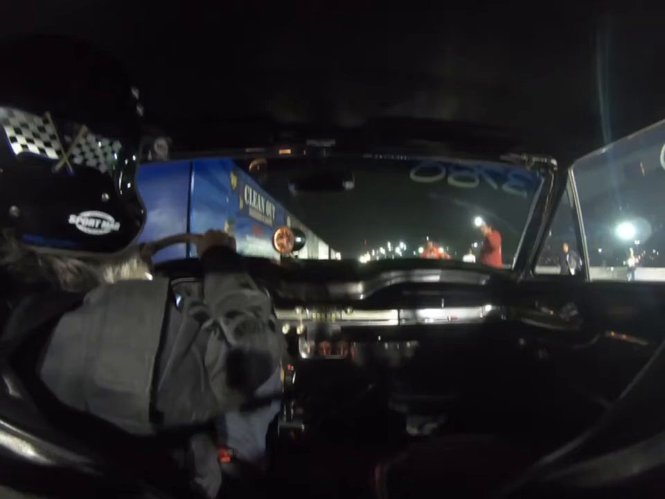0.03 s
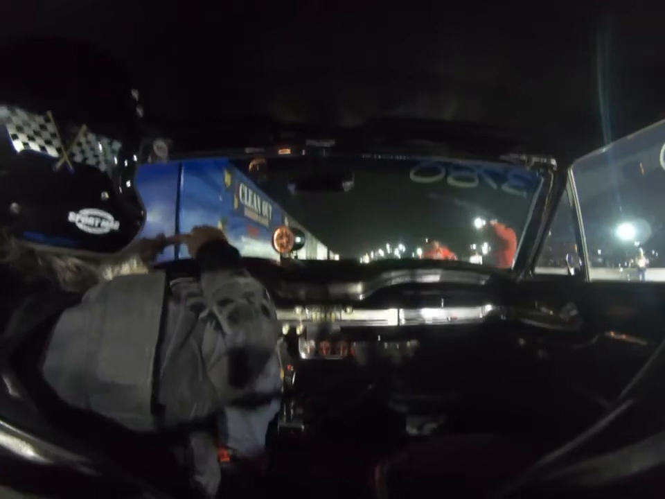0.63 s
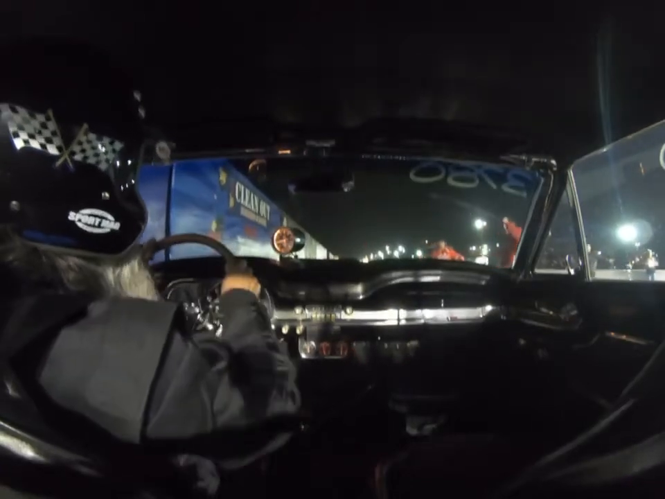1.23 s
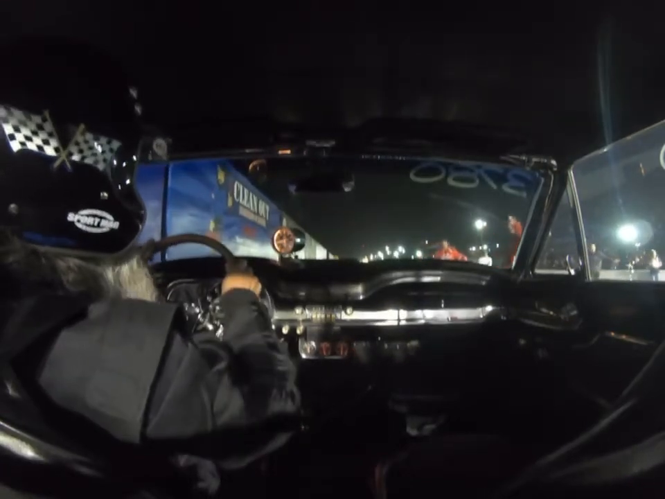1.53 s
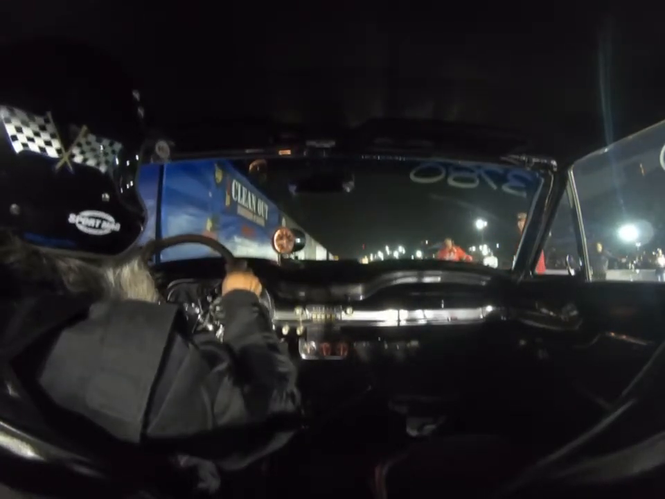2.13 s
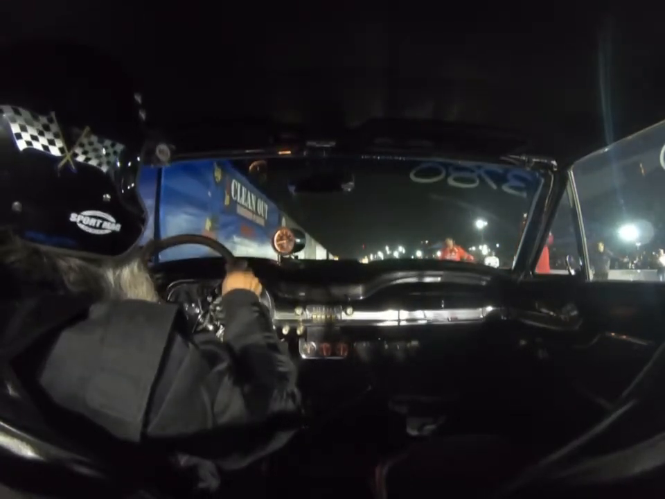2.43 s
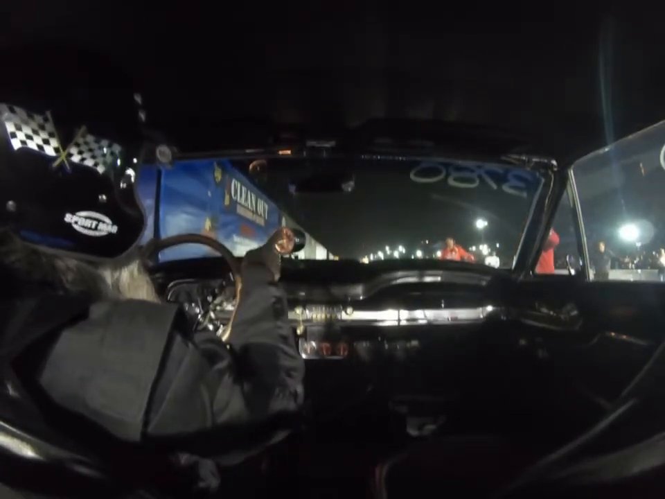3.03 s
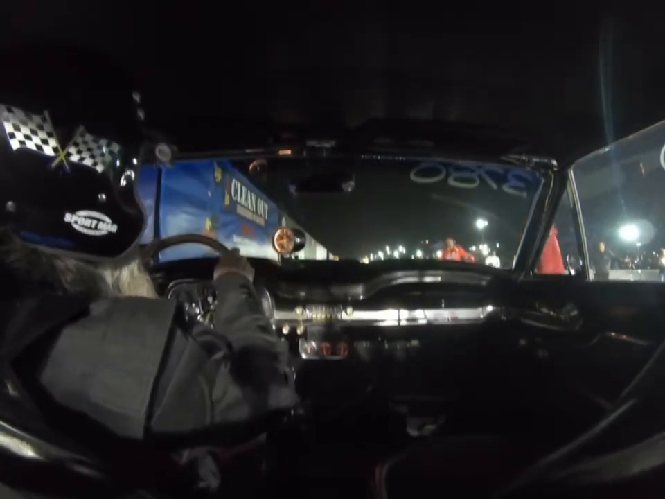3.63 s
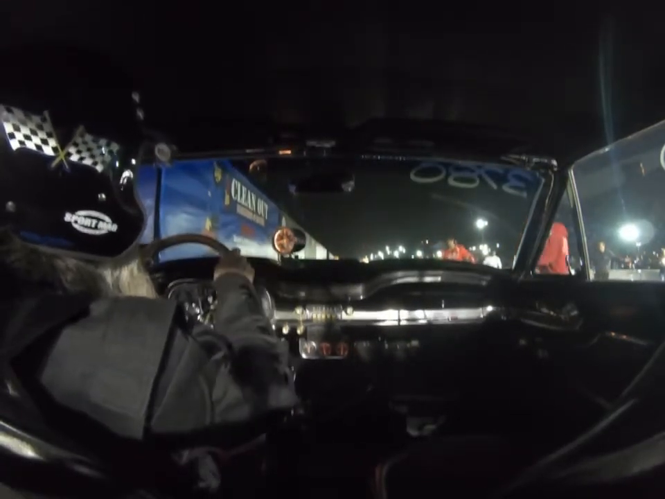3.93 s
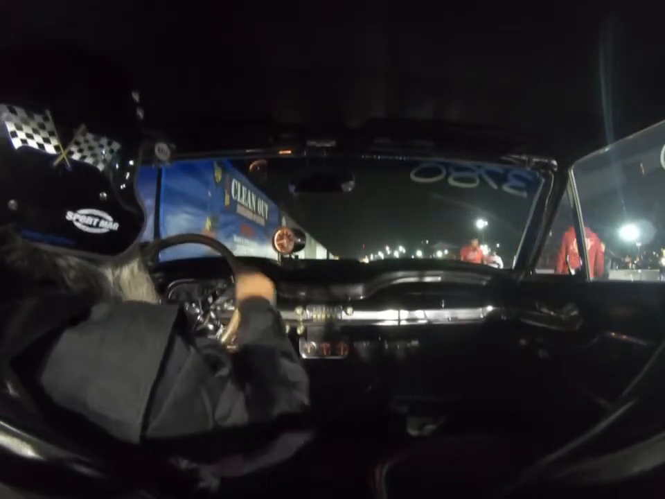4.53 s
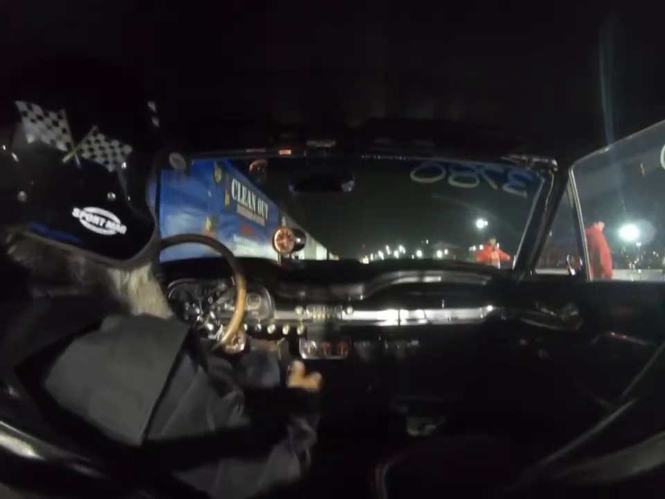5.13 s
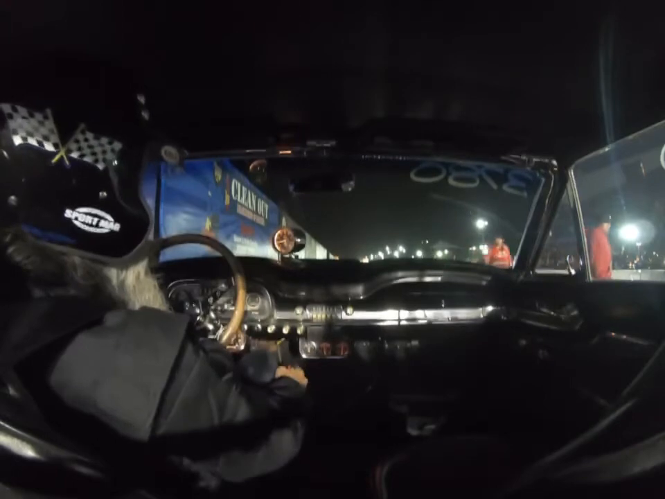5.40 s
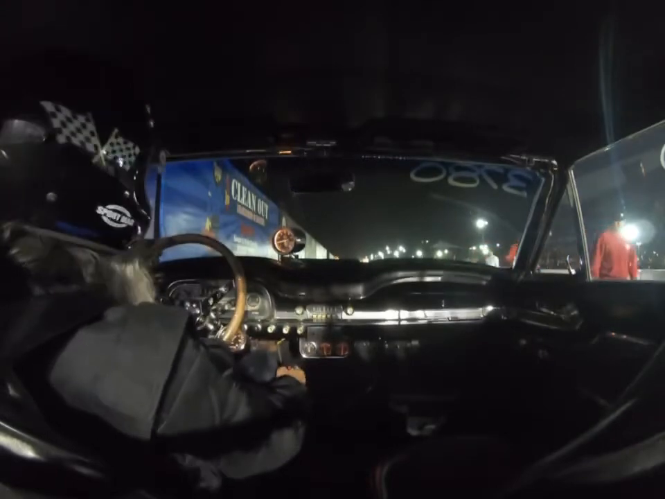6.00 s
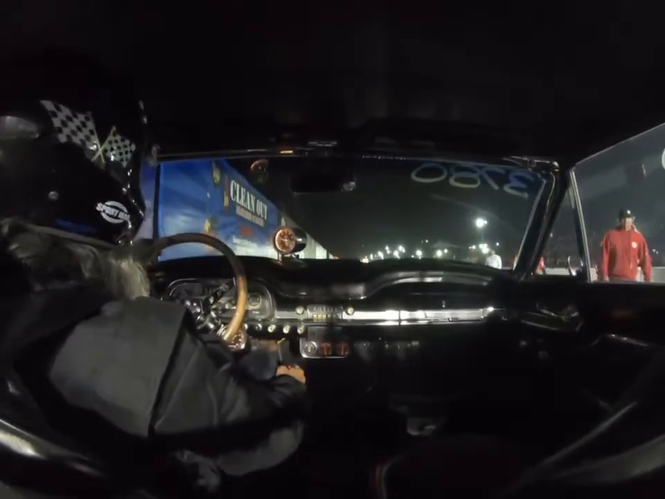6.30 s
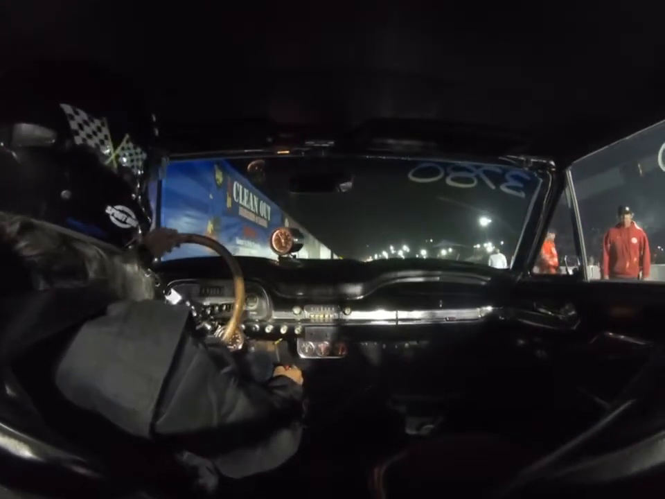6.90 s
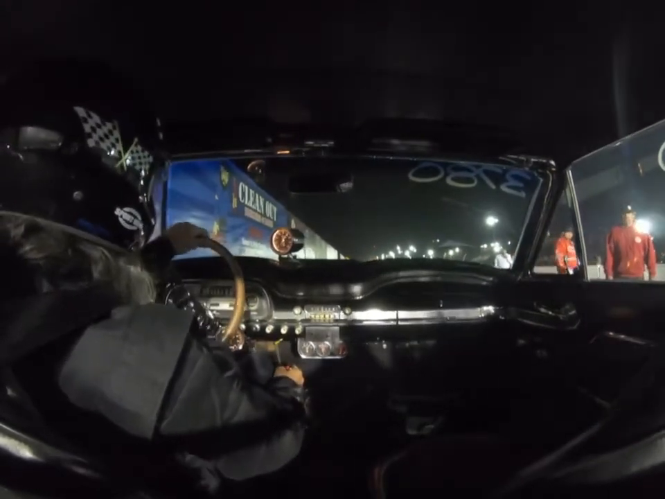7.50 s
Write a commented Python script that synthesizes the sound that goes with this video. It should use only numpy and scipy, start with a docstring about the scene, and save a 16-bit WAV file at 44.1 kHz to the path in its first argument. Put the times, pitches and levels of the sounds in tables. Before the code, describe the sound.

An old V8 drag car idles, heard from inside the cabin as a deep, uneven boom with a raspy exhaust and faint rattles of loose trim. After about five seconds there is one sharp, dry click. Then the throttle opens and the revs climb into a loud, rough roar that keeps rising in pitch to the end.

```python
"""A loping idle booms and rasps in the cabin of an old V8 drag car waiting at the strip. Uneven firing drives
the cabin's resonances in lumps, and loose trim rattles. A sharp click sounds about half a second before the
throttle opens and the revs climb to a loud roar: the engine's orders, harmonics of its four-stroke cycle, sweep
through the resonances of pipes and cabin, over firing blasts and rushing gas."""
import sys
import numpy as np
from scipy import signal
from scipy.fft import rfft, irfft, next_fast_len
from scipy.io import wavfile
from scipy.ndimage import uniform_filter1d, minimum_filter1d, map_coordinates

SR = 44100
rng = np.random.default_rng(int(sys.argv[2]) if len(sys.argv) > 2 else 0)


def to_wav(sig):
    """Store sig (one row per channel, or 1-D mono) as 16-bit WAV at the path in sys.argv[1].

    Samples outside -1..1 are clipped; the rate is SR.
    """
    pcm = np.clip(np.atleast_2d(sig), -1, 1) * 32767
    pcm = np.round(pcm).astype(np.int16)
    wavfile.write(sys.argv[1], SR, pcm.T)  # frames by channels


N = 341775
OPEN_S = 5.875  # the throttle opens
USUAL_LUMP_DB = -45.5  # relative rasp level of a usual lump

# The idle's lumps, each a run of firings that ends in a stumble:
# (time [s], relative rasp level [dB], the same in the closing lull [dB], dip of the boom [dB])
LUMP_ROWS = [(0.071, -45.5, -48.5, 8), (0.159, -44, -48.5, 3), (0.239, -49, -54.5, 12),
             (0.347, -45, -47.5, 7), (0.439, -45, -52, 9), (0.554, -46, -48.5, 0.5), (0.633, -46, -44.5, 5),
             (0.712, -45, -49.5, 7), (0.801, -45.5, -56, 16), (0.882, -48.5, -55.5, 10.5),
             (0.977, -44.5, -55.5, 10), (1.098, -44, -52.5, 18.5), (1.196, -44, -49.5, 14),
             (1.278, -42.5, -48, 19.5), (1.371, -45.5, -53, 12.5), (1.46, -45, -52.5, 10.5),
             (1.528, -45, -53, 20.5), (1.638, -45.5, -49.5, 9.5), (1.75, -45.5, -47.5, 11),
             (1.812, -46.5, -53, 12), (1.867, -44, -47.5, 6.5), (1.968, -44.5, -46.5, 6),
             (2.062, -44.5, -48.5, 0), (2.122, -45.5, -50, 10.5), (2.212, -46, -53.5, 11.5),
             (2.286, -46.5, -53, 9), (2.33, -45, -51.5, 21.5), (2.405, -42.5, -48.5, 19.5),
             (2.464, -42.5, -52.5, 9.5), (2.526, -44, -47.5, -2.5), (2.633, -44, -47.5, 1.5),
             (2.781, -44.5, -51, 11), (2.861, -59, -63.5, 7.5), (2.976, -48, -46, 5),
             (3.08, -44.5, -53, 12), (3.197, -45.5, -48.5, 2), (3.3, -43, -49, 6.5),
             (3.372, -46.5, -55.5, 14.5), (3.47, -46.5, -46.5, 2.5), (3.565, -45.5, -57, 5.5),
             (3.667, -47, -53, 24.5), (3.738, -43.5, -51, 7.5), (3.832, -46, -55, 4.5),
             (3.93, -47.5, -54, 14), (3.994, -46.5, -49.5, 4.5), (4.104, -44.5, -53, 14),
             (4.207, -47, -57.5, 16.5), (4.305, -45.5, -49, 5), (4.404, -42.5, -47.5, 5.5),
             (4.483, -45.5, -53.5, 16.5), (4.573, -45.5, -54, 13), (4.661, -44, -54, 23.5),
             (4.752, -48, -59, 15), (4.863, -44.5, -52, 12), (4.956, -42.5, -48, 19), (5.059, -46, -52, 4),
             (5.14, -47, -54, 2), (5.219, -45.5, -50.5, 13), (5.308, -48.5, -55.5, 13.5),
             (5.414, -50.5, -58, 9), (5.488, -45, -52, 5), (5.591, -45, -50.5, 4.5),
             (5.692, -41, -47, 19.5), (5.79, -44.5, -49, 4)]


def idle():
    """Amplitude modulation: uneven firing makes boom, rasp and buzz rise and fall in lumps."""
    _, rasp_db, lull_db, dip_db = np.transpose(LUMP_ROWS)
    sag = amp(-np.abs(dip_db))
    firings = idle_firings(sag)
    body = boom(firings, rasp_db, sag) + shake() + burble(firings)
    lump_db = lope(rasp_db, rasp_db, lull_db, rise_s=0.0029, hold=0.51, gap_s=0.021) + 2 * wobble(60)
    return body + rasp(firings, lump_db) + panel_buzz(lump_db)


def idle_firings(sag, centre_hz=61.54, hunt_depth=1.356, stumble_hz=27.7):
    """Frequency modulation: the firing rate hunts and stumbles; its integral counts the firings."""
    # Surges about 2/3 s apart: (time [s], firing rate before hunt_depth widens its swing [Hz])
    hunt = [(.2, 64), (.38, 58.8), (.74, 65.88), (0.999, 56.9), (1.36, 66.6), (1.62, 57.16), (1.86, 60.2),
            (2.049, 66), (2.45, 59.4), (2.62, 59.9), (2.799, 69.2), (3.0, 56.36), (3.45, 63.73),
            (3.85, 63.67), (4.3, 59.96), (4.52, 66.8), (4.8, 57.54), (5.101, 64.95), (5.38, 63.15),
            (5.569, 58.76), (5.85, 67.1)]
    steady = np.zeros(len(sag))
    stumble = lope(steady, steady, 1 - sag, rise_s=0.012, hold=0.564, gap_s=0.00646) ** 3
    surge_hz = hunt_depth * (curves(hunt)[0] - centre_hz)
    rate = centre_hz - 1.3 + surge_hz + 0.8 * wobble(30) - stumble_hz * (stumble - stumble.mean())
    return np.cumsum(rate) / SR


def boom(firings, rasp_db, sag):
    """Forced oscillation: the cabin air booms at the firing rate, sagging as each lump ends."""
    _, length = lump_spans()
    hold = 1 - 0.36 * np.minimum(length, 0.11) / length  # caps the stumble of a long lump
    push = amp(-9 + 0.3 * (rasp_db - USUAL_LUMP_DB))
    swell = lope(push, push, push * sag, rise_s=0.012, hold=hold, gap_s=0.005)
    phase = 2 * np.pi * firings + np.array([[0.13], [-0.13]])  # left and right are out of step
    return swell * (np.sin(phase) + amp(-30) * np.sin(2 * phase) + amp(-38) * np.sin(3 * phase))


def rev():
    """Superposition under throttle: exhaust orders, roar and rumble add as the revs climb."""
    # Engine speed: (time [s], four-stroke cycle rate [Hz])
    run_up = [(5.85, 8.16), (6.008, 10.1), (6.072, 11.6), (6.156, 15.0), (6.21, 17.4), (6.29, 20.1),
              (6.38, 22.03), (6.48, 23.53), (6.6, 25.48), (6.7, 26.32), (6.81, 26.87), (6.9, 27.85),
              (7.0, 29.45), (7.09, 31.3), (7.18, 33.9), (7.28, 38.1), (7.39, 41.8), (7.49, 45),
              (7.59, 47.77), (7.67, 49.52), (7.75, 50.68)]
    # Relative levels under load: (time [s], exhaust [dB], roar [dB], rumble [dB])
    load = [(5.87, -27, -39.5, -30.5), (6.0, -25, -41, -35), (6.07, -20.5, -39.5, -30.5),
            (6.17, -27.5, -31, -36.5), (6.28, -22, -26.5, -22), (6.55, -19.5, -27, -35),
            (7.0, -18, -23.5, -21.5), (7.25, -19.5, -24, -29), (7.52, -16, -25, -28.5),
            (7.75, -16.5, -24, -28)]
    speed = curves(run_up)[0]
    exhaust_db, roar_db, rumble_db = curves(load)
    cycles = np.cumsum(speed * (1 + .001 * wobble(20))) / SR
    noise = roar(cycles, roar_db) + rumble(rumble_db)
    return exhaust_orders(cycles, speed, exhaust_db) + noise


def exhaust_orders(cycles, speed, exhaust_db):
    """Harmonic series: unequal cylinders sound each multiple of the cycle, swelling at resonances."""
    # Strongest orders passing through booms of pipes and cabin: {order: (time [s], level [dB])}
    booms = {2: [(6.1, -50), (6.28, -37), (6.36, -21.5), (6.9, -24), (7.02, -15.5), (7.22, -15), (7.5, -10),
             (7.59, -18), (7.75, -21.5)], 3: [(6.1, -35.5), (6.25, -25.5), (6.5, -18), (6.82, -15.5),
             (7.05, -28), (7.75, -27)], 4: [(6.08, -44), (6.2, -21.5), (6.28, -19), (6.43, -18.5),
             (6.6, -36), (6.85, -36), (6.97, -22), (7.1, -39), (7.75, -54.5)], 8: [(5.87, -8), (6.065, -13),
             (6.11, -21.5), (6.3, -21.5), (6.4, -31), (6.55, -22), (6.9, -21), (7.08, -21.5), (7.17, -11),
             (7.24, -13), (7.3, -17.5), (7.4, -19.5), (7.49, -32), (7.58, -25.5), (7.75, -22)],
             16: [(6.1, -42), (6.25, -23), (6.5, -35), (6.66, -31), (6.85, -25.5), (7.2, -32), (7.48, -32),
             (7.62, -23), (7.75, -34)]}
    # Other orders, set by the unequal cylinders: {order: relative level [dB]}
    lower_db = {1: 1, 5: 2, 6: 0.5, 7: -2, 9: 1, 10: -0.5, 11: 5.5, 12: 0.5, 13: -1, 14: 7.5, 15: -1.5, 17:
                4.5, 18: -3.5, 19: 6.5, 20: -1, 21: 7, 22: -0.5, 23: -2, 24: 7}
    # Above those, a pattern repeating every eight orders: (relative level [dB])
    upper_db = [0.5, -0.5, 4.5, -2, 0, -1.5, 1.5, -2]
    # Response of pipes and cabin, booming near 80 Hz: (frequency [Hz], gain [dB])
    pipe_tone = [(25, -17), (45, -14.5), (62, 3.5), (85, 5), (110, -8), (150, -13), (175, -13),
                 (205, -20.5), (240, -15.5), (280, -11.5), (320, -17), (370, -19), (450, -22), (530, -27),
                 (600, -24.5), (660, -28), (720, -31.5), (780, -22.5), (870, -22), (950, -28.5),
                 (1080, -21.5), (1180, -20.5), (1280, -27.5), (1550, -26.5), (1900, -24), (2300, -39),
                 (3200, -34)]
    # Orders between firings come in as the engine takes load: (cycle rate [Hz], gain [dB])
    uneven = [(11, -17.5), (15, 0.5)]
    on = slice(int((OPEN_S - .1) * SR), N)
    load_db = exhaust_db[on] + along(uneven, speed[on])
    hz = np.arange(SR // 8)
    pipe_db = along(pipe_tone, hz) + 0.49 * (cabin_lift(hz) - 2.5)
    orders = lower_db | dict(enumerate(5 * upper_db, max(lower_db) + 1))
    levels = {k: curves(rows)[0][on] + 2 * wobble(12)[on] for k, rows in booms.items()}
    for k, order_db in orders.items():
        levels[k] = load_db + order_db + np.interp(k * speed[on], hz, pipe_db) + 2.2 * wobble(12)[on]
    out = np.zeros((2, N))
    for k, level_db in levels.items():
        phase = 2 * np.pi * (k * cycles[on] + rng.random())
        phase += (0.13 + .003 * k) * wobble(24)[on]
        spread = 0.09 + 0.0098 * k  # shorter waves reach left and right less alike
        out[:, on] += np.sqrt(2) * amp(level_db) * np.sin([phase + spread, phase - spread])
    return out


def roar(cycles, level_db):
    """Broadband excitation: rushing gas and firing blasts drive the cabin's resonances."""
    # Roar spectrum: (frequency [Hz], relative level [dB])
    tone = [(240, -27.5), (450, -8), (700, -13.5), (850, -8), (1200, -9), (1450, -7.5), (1950, -8),
            (3000, -14), (3900, -18.5), (5640, -21.5), (7600, -24), (10200, -32), (11300, -42.5),
            (14000, -51), (20000, -120)]
    gas = patchy(2.3) * puffs(8 * cycles, sharp=0.11)
    return amp(level_db + 2.5) * in_cabin(gas + blasts(cycles), tone, ring=1.0)


def blasts(cycles, cylinders=8, scatter=0.29, lag_s=.0012, t60=0.21):
    """Convolution: the pipes smear one pulse per firing, each cylinder with its own size and lag."""
    at = np.flatnonzero(np.diff(np.floor(cylinders * cycles)))
    cylinder = np.arange(len(at)) % cylinders
    pulses = np.zeros((2, N))
    for channel in pulses:
        size = amp(1.8 * rng.standard_normal(cylinders))[cylinder]
        size *= 1 + scatter * rng.standard_normal(len(at))
        lag = (lag_s * SR * rng.random(cylinders)).astype(int)[cylinder]
        channel[np.minimum(at + lag, N - 1)] = size
    t = np.arange(SR // 20) / SR
    pipe = rng.standard_normal((2, len(t))) * amp(-60 * t / t60)
    smeared = signal.fftconvolve(pulses, pipe, axes=1)[:, :N]
    power = np.abs(uniform_filter1d(smeared ** 2, size=8000, axis=1))
    return smeared / np.sqrt(power + 1e-6)


def rumble(level_db):
    """Resonant filtering: the cabin colours a rough, low noise under throttle."""
    # Rumble spectrum: (frequency [Hz], relative level [dB])
    tone = [(15, -37.5), (35, -1), (70, 1), (120, 0), (200, -3), (300, -2), (450, -18.5), (700, -35),
            (1500, -56)]
    return amp(level_db) * in_cabin(patchy(0.61), tone, ring=0.74)


def shake():
    """Band-limited noise: a steady, deep shudder under the idle."""
    # Shudder spectrum: (frequency [Hz], relative level [dB])
    tone = [(15, -22), (35, 3), (60, 4), (90, 2.5), (130, -16.5), (250, -28.5), (700, -120)]
    return amp(-23) * in_cabin(patchy(0.49), tone, ring=0)


def burble(firings):
    """Modulated noise: a low burble ripples at the firing rate."""
    # Swells with the surges of the idle: (time [s], level [dB])
    swells = [(0.1, -39.5), (0.29, -38), (0.32, -49), (0.38, -40.5), (0.83, -38.5), (0.97, -48.5),
              (1.36, -36), (1.56, -46), (2.16, -38), (2.47, -47), (2.76, -33.5), (2.92, -44.5),
              (3.61, -37.5), (3.72, -42), (4.11, -39.5), (4.36, -44.5), (4.45, -35), (4.78, -46.5),
              (5.17, -36), (5.38, -40), (5.5, -45), (5.8, -37)]
    # Burble spectrum: (frequency [Hz], relative level [dB])
    tone = [(53, -37), (90, -17), (151, -16.5), (187, -6.5), (365, -16.5), (441, -16.5), (514, -26.5),
            (658, -29), (1500, -33.5), (1950, -53), (3300, -120)]
    return amp(curves(swells)[0]) * in_cabin(patchy(1.86) * puffs(firings, sharp=0.073), tone, ring=0.94)


def rasp(firings, lump_db):
    """Modulated noise: the exhaust's bright rasp follows each lump and rings the cabin."""
    # Rasp spectrum: (frequency [Hz], relative level [dB])
    tone = [(300, -35.5), (700, -5.5), (950, -6.5), (1580, -4), (2510, -12), (4460, -12.5), (8120, -19),
            (10000, -24.5), (11200, -34.5), (13500, -35), (16000, -74)]
    return amp(lump_db + 3) * in_cabin(patchy(2.9) * puffs(firings, sharp=0.16), tone, ring=1.43)


def panel_buzz(lump_db):
    """Nonlinear response: strong lumps set the panels buzzing, 1.7 dB more per dB of rasp."""
    # Buzz spectrum: (frequency [Hz], relative level [dB])
    tone = [(700, -37), (1500, -12), (2400, 2.5), (3500, -2), (5000, -11), (9000, -19.5), (12000, -49)]
    return amp(-51.5 + 1.7 * (lump_db - USUAL_LUMP_DB)) * in_cabin(patchy(3.5), tone, ring=0.41)


def click(at_s, db, decay_s):
    """Exponential relaxation: a sudden step dies away as one dry click."""
    t = np.arange(N) / SR - at_s
    return amp(db) * (t >= 0) * np.exp(-np.abs(t) / decay_s)


def rattles(t60=0.023, chatter_s=0.0059, clatter_hz=3000):
    """Impact excitation: loose trim chatters on its seat, with a dry clatter and briefly ringing modes."""
    # Metal pieces shaken by a lump: (time [s], ring frequency [Hz], relative level [dB])
    pieces = [(0.274, 4430, -55), (0.456, 1900, -48.5), (1.189, 2980, -53), (1.96, 2380, -44.5),
              (2.462, 5270, -55.5), (2.65, 4350, -55), (4.429, 2404, -50), (4.9, 2084, -48),
              (5.522, 2330, -50.5), (5.585, 4150, -58), (5.64, 2490, -48.5)]
    # Modes of a piece: (frequency ratio, relative level [dB])
    modes = [(1, 7.5), (1.19, -19.5), (1.45, -4), (1.9, -10)]
    t = np.arange(SR // 8) / SR
    chatter = t / chatter_s * np.exp(-t / chatter_s)
    rings, contacts = np.zeros((2, 2, N))
    for s, hz, db in pieces:
        taps = (rng.random(len(t)) < 1200 / SR) * rng.standard_normal(len(t)) * chatter
        ring = sum(amp(level - 60 * t / t60)
                   * np.sin(2 * np.pi * ratio * hz * t + rng.normal(0, 0.54, (2, 1)))
                   for ratio, level in modes)
        scrape = rng.standard_normal((2, len(t))) * chatter
        ringing = signal.fftconvolve(taps[None], ring, axes=1)[:, :len(t)]
        rings[:, round(s * SR):][:, :len(t)] += amp(db - 0.5) * unit(ringing)
        contacts[:, round(s * SR):][:, :len(t)] += amp(db - 2.5) * unit(scrape)
    return rings + filtered(contacts, lambda hz: np.exp(-2 * np.log((hz + 1) / clatter_hz) ** 2))


def in_cabin(pair, tone, ring):
    """Source and filter: a tone and the cabin colour two excitations into left and right of rms 1."""
    # Likeness of left and right: (frequency [Hz], correlation, taken as 0 where negative)
    alike = [(60, 0.91), (110, 1), (190, 0.97), (330, 0.98), (580, 0.75), (1030, 0.2), (1810, 0.22),
             (3200, 0.75), (5640, 0.2), (9960, -0.33)]

    def response(hz):
        angle = np.arccos(np.clip(along(alike, hz), 0, 1)) / 2
        return amp(along(tone, hz) + ring * cabin_lift(hz)) * np.array([np.cos(angle), np.sin(angle)])
    mid, side = filtered(pair, response)
    return unit(np.array([mid + side, mid - side]))


def cabin_lift(hz):
    """Resonance: each mode adds a bell-shaped peak of gain, in dB."""
    # Modes of the cabin and its panels: (frequency [Hz], width [Hz], lift [dB])
    modes = [(278.4, 13, 4), (332.2, 7.6, 5.5), (599, 210, 8.5), (780, 14, 8.5), (868, 34, 6),
             (1082, 37, 7.5), (1197, 40, 6), (1335, 17, 7), (1564, 14, 6), (1742, 10, 8), (1899, 18, 7),
             (1990, 50, 5), (2220, 52, 5.5), (2360, 17, 7), (2500, 27, 7), (2840, 2.8, 5), (2970, 4.2, 11),
             (3320, 12, 5.5)]
    return sum(db / (1 + (2 * (hz - centre) / width) ** 2) for centre, width, db in modes)


def lump_spans():
    """Onset and length of each lump, in seconds."""
    onset = np.transpose(LUMP_ROWS)[0]
    return onset, np.diff(onset, append=OPEN_S + 0.0088)


def lope(start, full, lull, rise_s, hold, gap_s):
    """Envelope: each lump catches, is full after the share hold, then sinks to its lull."""
    onset, length = lump_spans()
    caught, sunk = onset + rise_s, onset + length - gap_s
    held = caught + np.minimum(hold, .9) * (sunk - caught)
    times = np.column_stack([caught, held, sunk, onset + length])
    return line(times.ravel(), np.column_stack([start, full, lull, lull]).ravel())


def puffs(firings, sharp):
    """Periodic gain that peaks once per firing."""
    return unit(np.exp(sharp * np.cos(2 * np.pi * firings)))


def patchy(depth_db):
    """Two noises whose gain varies in patches of time and frequency."""
    spectra = signal.stft(rng.standard_normal((2, N)), nperseg=512)[2]
    field = uniform_filter1d(rng.standard_normal(spectra.shape[1:]), size=7, axis=0)
    field = uniform_filter1d(field, size=6, axis=1)
    return unit(signal.istft(spectra * amp(depth_db * unit(field)), nperseg=512)[1][:, :N])


def amp(db):
    """Decibels to gain."""
    return 10 ** (np.asarray(db) / 20)


def unit(x):
    """Scaled to rms 1."""
    return x / np.sqrt(np.mean(x ** 2) + 1e-20)


def along(points, hz):
    """(frequency [Hz], value) points read on a log axis."""
    f, v = np.transpose(points)
    return np.interp(np.log(hz + 1), np.log(f + 1), v)


def line(times, values):
    """Linear interpolation, one value per sample."""
    return np.interp(np.arange(N) / SR, times, values)


def curves(rows):
    """One line for each column after the time."""
    times, *columns = np.transpose(rows)
    return [line(times, column) for column in columns]


def wobble(rate):
    """A smooth random curve, rate knots a second."""
    knots = rng.standard_normal(int(N * rate / SR) + 4)
    coarse = np.arange(0, N + 32, 32) / SR
    return line(coarse, map_coordinates(knots, [coarse * rate]))


def filtered(x, response):
    """Linear filtering: the spectrum of x times a response of frequency."""
    m = next_fast_len(N + SR // 4)
    return irfft(rfft(x, m) * response(np.fft.rfftfreq(m, 1 / SR)), m)[..., :N]


def bass_limited(x, below_hz, ceiling_db):
    """Fast limiting of the bass alone: the strongest lumps come out equally high."""
    bass = filtered(x, lambda hz: 1 / (1 + (hz / below_hz) ** 8))
    peak = np.abs(signal.hilbert(bass.mean(axis=0), next_fast_len(N)))[:N]
    needed = np.minimum(1, amp(ceiling_db) / (peak + 1e-9))
    gain = uniform_filter1d(minimum_filter1d(needed, size=440), size=440)
    return x + (gain - 1) * bass


def scene():
    """Equal-power crossfade from idle to rev; the whole is a little stronger on the right."""
    throttle = line([OPEN_S - .006, OPEN_S + 0.01], [0, np.pi / 2])
    engine = np.cos(throttle) * idle() + np.sin(throttle) * rev()
    return (engine + rattles() + click(5.4233, db=-13.5, decay_s=0.0045)) * amp([[-.4], [.4]])


def record(dry):
    """Bass limiting, soft clipping and a steep low-pass, after a moment of silence."""
    fade_in = line([.071, .074], [0, 1])
    held = bass_limited(dry, below_hz=142, ceiling_db=-8)
    rounded = held / (1 + np.abs(held / .95) ** 6) ** (1 / 6)
    return filtered(rounded * fade_in, lambda hz: 1 / (1 + (hz / 15100) ** 60))


dry = scene()
out = record(dry)
to_wav(out)
```